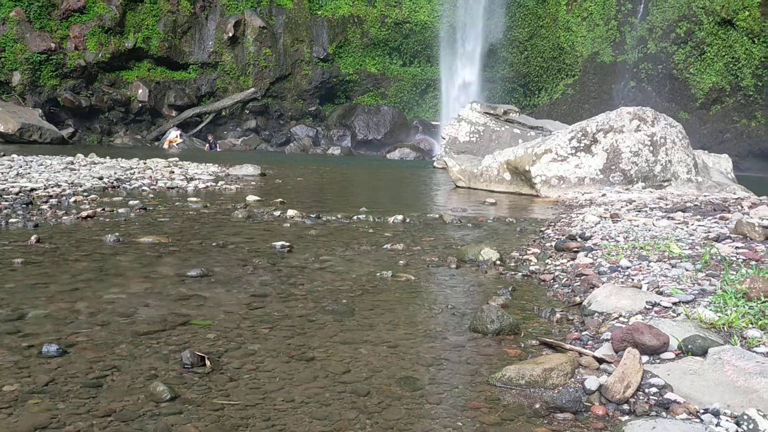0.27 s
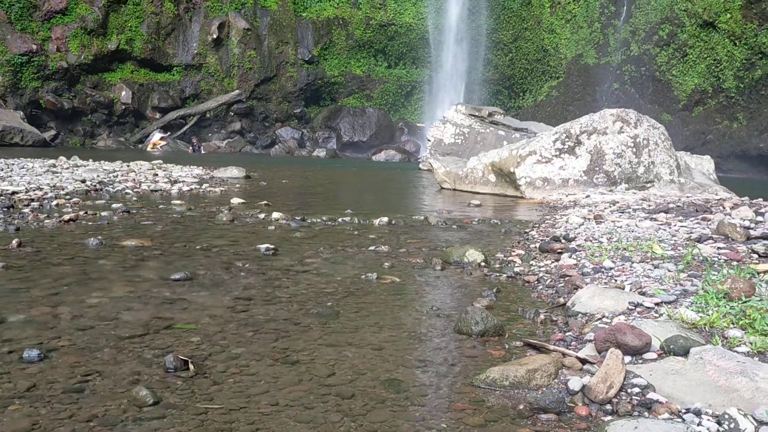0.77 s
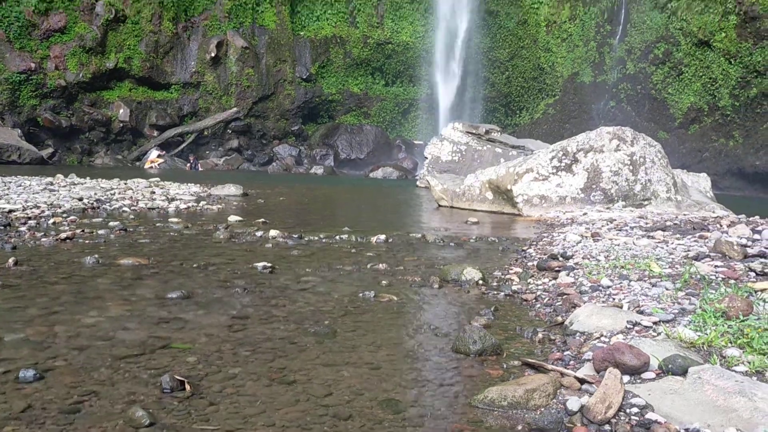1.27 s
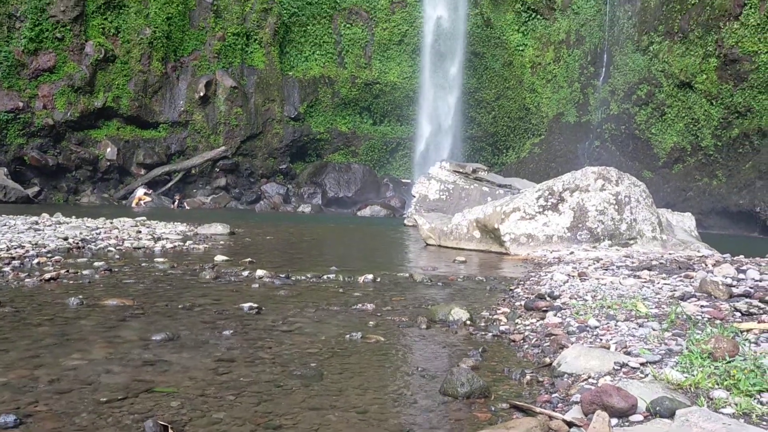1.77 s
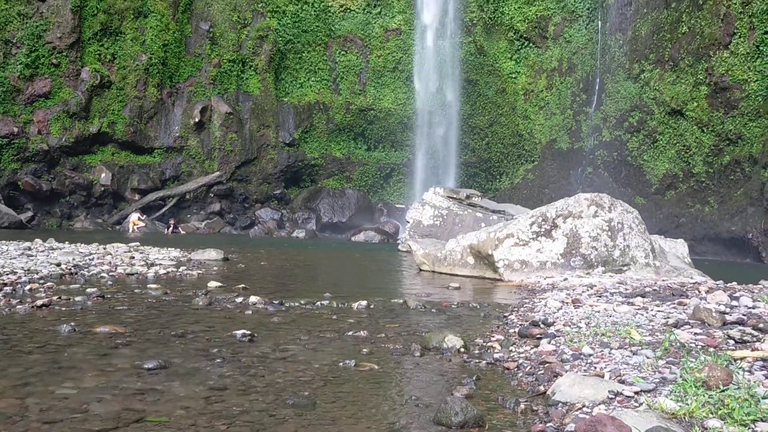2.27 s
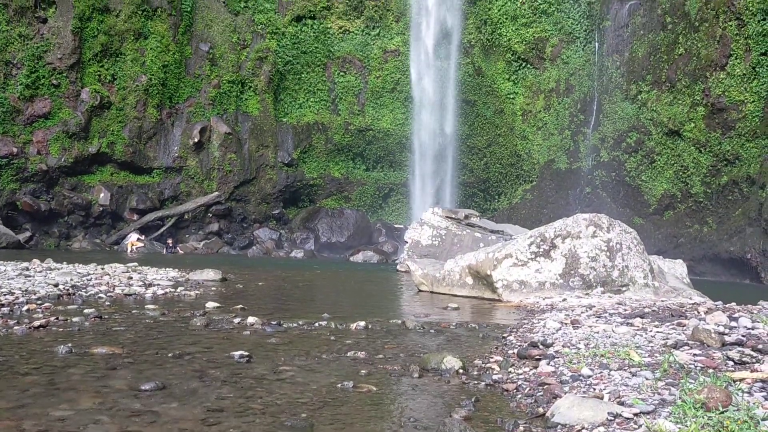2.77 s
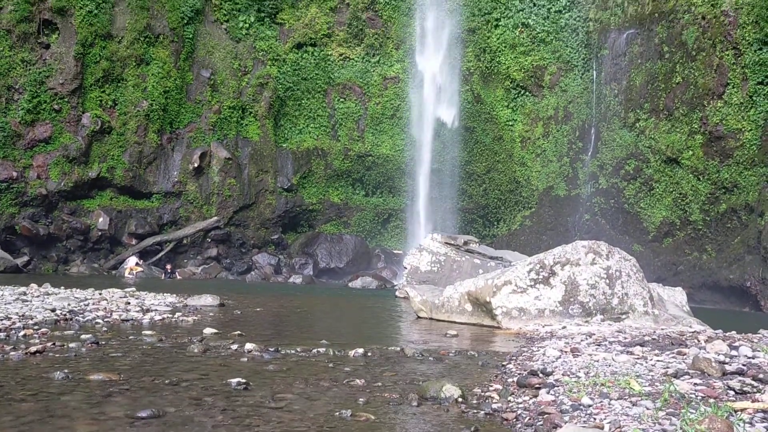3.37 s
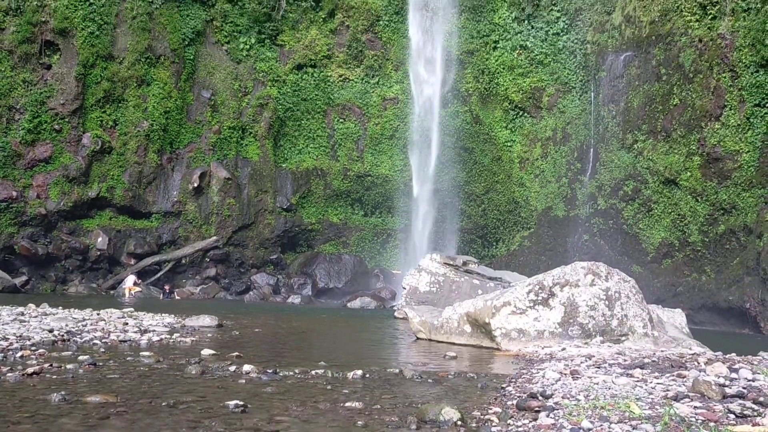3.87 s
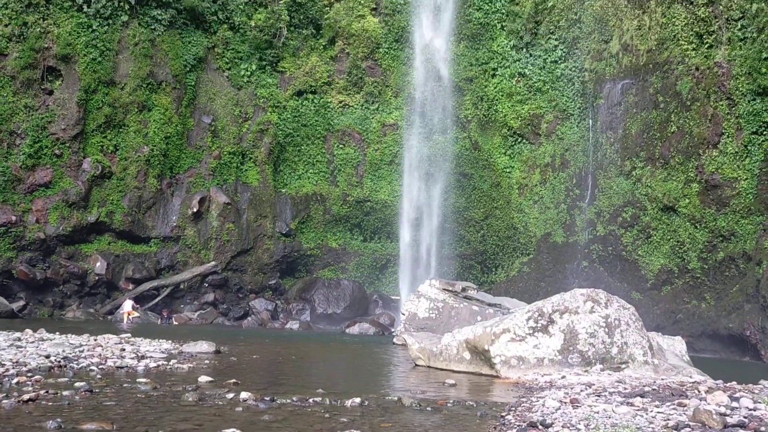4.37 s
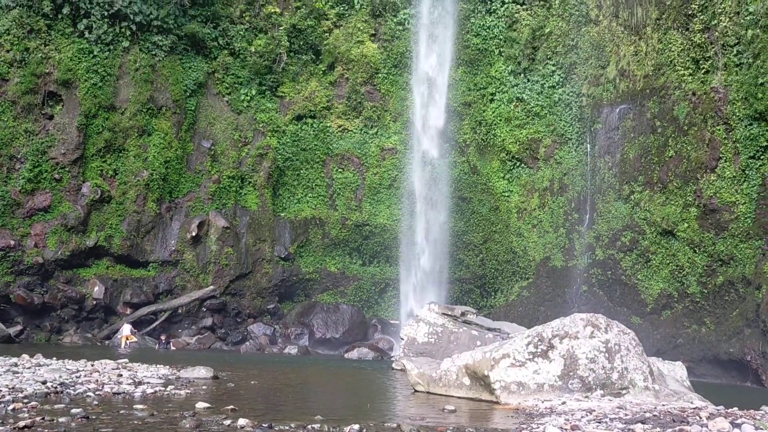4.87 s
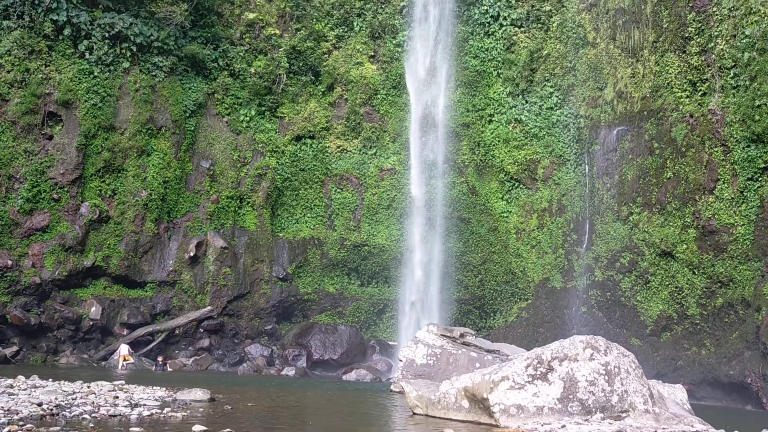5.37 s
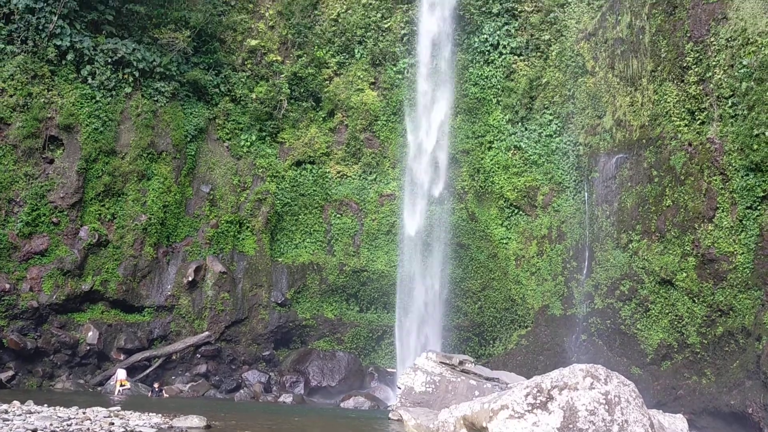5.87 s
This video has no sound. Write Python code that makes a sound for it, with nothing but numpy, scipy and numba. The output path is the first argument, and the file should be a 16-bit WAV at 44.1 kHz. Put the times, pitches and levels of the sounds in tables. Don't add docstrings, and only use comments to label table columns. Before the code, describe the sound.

Constant outdoor waterfall rush, crisp high hiss above a low watery roar, slowly growing fuller, dotted with tiny droplet ticks and bubbles.

```python
import sys
import numpy as np
from scipy import signal
from scipy.fft import rfft, irfft, next_fast_len
from scipy.io import wavfile
from scipy.ndimage import uniform_filter1d
from numba import njit

SR = 44100
rng = np.random.default_rng(int(sys.argv[2]) if len(sys.argv) > 2 else 0)


def nominal_scale(level):
    x = np.asarray(level, float) / 20
    return 10 ** x


def file_out(sig):
    cols = np.atleast_2d(sig).T
    lim = np.clip(cols, -1, 1)
    pcm = np.round(lim * 32767).astype(np.int16)
    wavfile.write(sys.argv[1], SR, pcm)


N = 269892


def plunge():
    # pitch_hz, density_db (per Hz)
    roar_tone = [(76, -29.5), (130, -2.5), (212, 1), (435, 0.5), (570, 1.5), (750, 3), (890, 0), (1130, -7),
                 (1600, -14), (2200, -16.5), (2600, -21), (3000, -28), (3500, -46.5), (6800, -120)]
    # crest_s, lift_db
    surges = [(.61, 2.5), (1.0, 3.5), (1.1, 3), (1.32, 1.5), (1.45, -3), (1.77, 0), (2.04, -4), (2.17, 1),
              (2.36, 5), (2.5, -1), (2.85, 3), (3.0, 1.5), (3.28, 3), (3.45, 2.5), (3.75, 0), (3.98, 3.5),
              (4.2, -1), (4.4, 3), (4.6, 1), (4.8, 1), (5.2, 2), (5.55, 2), (5.7, -3), (5.95, 1.5),
              (6.09, 2.5)]
    # crest_s, lift_db
    slaps = [(.62, 0), (1.0, 0.5), (1.45, 2), (1.86, 0.5), (2.04, -0.5), (2.34, 2), (3.2, 0.5), (3.5, 0.5),
             (3.8, -1.5), (4.02, -4), (4.32, 1), (4.46, 1.5), (4.58, 2), (5.2, 1.5), (5.32, 2), (5.7, -2),
             (6.01, 3)]
    crossover_hz, roar_db, splash_db = 1400, -13, -20.5
    turbulence = churn(80.04, count=17, shared_db=-0.86, own_db=0.15, rate=20)
    bubbles = swarm(count=9000, lo_hz=149.0, hi_hz=3307.0, cycles=1.75, spread_db=2.0, glide=0.18, tilt=0.98)
    body = colour(turbulence + nominal_scale(-9) * bubbles, roar_tone)
    splash = signal.sosfilt(signal.butter(4, crossover_hz, "high", fs=SR, output="sos"), body)
    roar = signal.sosfilt(signal.butter(4, crossover_hz, fs=SR, output="sos"), body)
    roar_level = flow_db() + roar_db + swells_db(*np.transpose(surges), rise_s=0.027, fall_s=0.061)
    splash_level = flow_db() + splash_db + swells_db(*np.transpose(slaps), rise_s=0.04, fall_s=0.072)
    return roar / np.std(roar) * nominal_scale(roar_level) + splash / np.std(splash) * nominal_scale(splash_level)


def spray():
    # pitch_hz, density_db (per Hz)
    hiss_tone = [(1820, -53), (3100, -28.5), (4540, -14), (5800, -7), (7470, 3), (7770, -1), (8050, -10),
                 (8500, -28), (8650, -64), (8960, -54.5), (11600, -79.5), (19700, -120)]
    # crest_s, lift_db
    bursts = [(1.15, 2), (2.17, 1.2), (2.87, 0.9), (3.27, 0.5), (3.45, 1), (4.02, 2.5), (4.6, 1.5),
              (4.93, 1), (5.2, 1), (5.65, 1.5)]
    hiss = churn(3100.0, count=5, shared_db=0.29, own_db=0.2, rate=23)
    crackle = swarm(count=14000, lo_hz=3095.0, hi_hz=8780.0, cycles=3.06, spread_db=3.0, glide=0.089, tilt=0.36)
    lift_db = swells_db(*np.transpose(bursts), rise_s=0.064, fall_s=0.052)
    return colour(hiss + nominal_scale(-11.0) * crackle, hiss_tone) * nominal_scale(flow_db() + lift_db)


def port_drops():
    # start_s, level_db (peak), pitch_hz, ring_ms
    droplets = [(0.2634, -24, 7400, 0.55), (1.1691, -18, 7300, 0.58), (1.5779, -12.5, 7500, 0.65),
                (1.8728, -20, 6660, 0.44), (2.0416, -17, 7600, 0.68), (2.9258, -14.5, 7540, 0.67),
                (3.248, -33, 7370, 0.61), (3.4715, -13.5, 7280, 0.7), (3.609, -20.5, 7420, 0.7),
                (3.7235, -17.5, 7030, 0.91), (3.96, -22.5, 7760, 0.75), (4.186, -18, 7700, 0.88),
                (4.299, -24, 7200, 0.67), (4.564, -8, 7260, 0.55), (4.6024, -14.5, 7350, 0.55),
                (4.8423, -14.5, 7370, 0.77), (5.5698, -15, 7250, 0.75), (5.616, -29, 7400, 0.75),
                (5.828, -19.5, 7370, 0.83), (5.998, -11, 7040, 0.61)]
    return singles(droplets, rise=2.42, glide=0., gain_db=23)


def stone_ticks():
    # start_s, level_db (peak), pitch_hz, ring_ms
    ticks = [(1.0331, -32.5, 5100, 0.55), (1.7632, -33, 4900, 0.32), (2.0672, -25, 4990, 0.13),
             (2.4763, -30, 5220, 0.4), (2.9294, -29.5, 5260, 0.47), (3.2723, -18, 5240, 0.25),
             (5.6294, -27, 5240, 0.24)]
    return singles(ticks, rise=0.68, glide=-0.3, gain_db=16.5)


def stream_plops():
    # start_s, level_db (peak), pitch_hz, ring_ms
    plops = [(0.664, -27, 637, 5.6), (0.818, -22.5, 1090, 4.2), (2.043, -17, 920, 2.9),
             (2.236, -20.5, 735, 3.5), (2.349, -22, 660, 5), (2.689, -21, 820, 8.1), (2.833, -25, 735, 5.7),
             (2.989, -20.5, 695, 5.7), (3.358, -22.5, 508, 6.9), (3.688, -18.5, 493, 4.9),
             (3.772, -19, 803, 4.5), (4.158, -21, 869, 4.7), (4.449, -12.5, 704, 2.5),
             (4.567, -18.5, 966, 3.7), (5.202, -16.5, 940, 3.7), (5.265, -30, 382, 5)]
    return singles(plops, rise=0.45, glide=0.15, gain_db=-4.0)


def small_splashes():
    # start_s, level_db (peak), pitch_hz, ring_ms
    splashes = [(1.2335, -43, 1630, 2.5), (2.0464, -44, 1580, 2.9), (2.3484, -38.5, 1460, 3.2),
                (2.7494, -47, 1430, 2.9), (4.307, -34.5, 1510, 1.8), (4.5688, -32.5, 1530, 2.3),
                (5.168, -36.5, 1690, 2), (5.5043, -36.5, 1920, 3), (5.883, -39, 1880, 2.5)]
    return singles(splashes, rise=0.12, glide=0.11, gain_db=6)


def deep_gulps():
    # start_s, level_db (peak), pitch_hz, ring_ms
    gulps = [(.99, -45, 165, 35), (1.66, -50, 139, 25), (2.13, -44, 190, 25), (2.92, -48, 172, 28),
             (3.96, -46, 188, 33), (5.68, -46, 210, 25), (5.86, -48, 201, 28)]
    return singles(gulps, rise=0.89, glide=0.19, gain_db=9)


def wind():
    # pitch_hz, density_db (per Hz)
    wind_tone = [(2, -12), (8, -8.5), (22, -3.5), (42, -4), (80, -7), (120, -8.5), (200, -51.5)]
    # crest_s, lift_db, length_s
    gusts = [(.61, 7, 0.059), (0.993, 8, .1), (1.296, 11.5, 0.11), (1.51, 8.5, 0.22), (1.86, 13, 0.17),
             (2.172, 10, 0.12), (2.9, 12.5, 0.09), (3.1, 8, .1), (3.327, 12, 0.13), (3.6, 9, 0.11),
             (3.956, 14, 0.073), (4.27, 9, .05), (4.4, 2, .05), (4.56, 7, .1), (4.89, 6, .12),
             (5.07, 9, .06), (5.2, 16, 0.13), (5.403, 16, 0.25), (5.748, 14.5, 0.09), (5.9, 10.5, 0.065),
             (6.007, 12, 0.072), (6.12, 8, .05)]
    calm_db, rise_share = -62.5, 0.68
    crest_s, lift_db, length_s = np.transpose(gusts)
    rumble = colour(rng.standard_normal(N), wind_tone)
    return rumble * nominal_scale(calm_db + swells_db(crest_s, lift_db, rise_share * length_s, length_s))


def flow_db():
    # time_s, level_db (of the spray)
    flow = [(.4, -34.5), (.75, -33.5), (1.1, -33), (1.4, -32.5), (1.8, -31.5), (2.3, -31.6), (2.75, -31),
            (3.2, -31), (3.7, -30.5), (4.2, -30.5), (4.7, -30), (5.3, -30), (5.8, -29.5), (6.12, -30.5)]
    return np.interp(np.arange(N) / SR, *np.transpose(flow))


def swells_db(crest_s, lift_db, rise_s, fall_s):
    coarse = np.arange(0, N, 64)
    late_s = coarse[:, None] / SR - crest_s
    shape = np.exp(-(late_s / np.where(late_s < 0, rise_s, fall_s)) ** 2)
    return np.interp(np.arange(N), coarse, np.max(lift_db * shape, axis=1))


def churn(lo_hz, count, shared_db, own_db, rate):
    size = next_fast_len(N)
    third = 3 * np.log2(np.arange(size // 2 + 1) * SR / size / lo_hz + 1e-9)
    total, shared = 0, walk(rate)
    for k in range(count):
        place = np.clip(np.clip(third, 0, count - 1) - k, -1, 1)
        spectrum = rfft(rng.standard_normal(size)) * np.cos(np.pi * place / 2)
        band = irfft(spectrum, size)[:N]
        total = total + band * nominal_scale(shared_db * shared + own_db * walk(1.2 * rate))
    return total / np.std(total)


def walk(rate):
    hold = int(SR / rate)
    held = np.repeat(rng.standard_normal(N // hold + 1), hold)
    return 1.3 * uniform_filter1d(uniform_filter1d(held, hold), hold)[:N]


def swarm(count, lo_hz, hi_hz, cycles, spread_db, glide, tilt):
    when, pitch, rare = rng.random((count, 3)).T
    hz = lo_hz + (hi_hz - lo_hz) * pitch
    size = nominal_scale(-spread_db * np.log(1 - .995 * rare)) * hz ** tilt
    y = grains(N, (when * N).astype(np.int64), hz, cycles * SR / hz, size, 0.27, glide)
    return y / np.std(y)


def singles(events, rise, glide, gain_db):
    start_s, level_db, pitch_hz, ring_ms = np.transpose(events)
    start = (start_s * SR).astype(np.int64)
    return grains(N, start, pitch_hz, ring_ms * SR / 1000, nominal_scale(level_db + gain_db), rise, glide)


@njit
def grains(count, start, hz, ring, size, rise, glide):
    out = np.zeros(count)
    for g in range(len(start)):
        phase, step = 0., 2 * np.pi * hz[g] / SR
        fall, swell = 1., 1.
        for i in range(start[g], min(count, start[g] + int(8 * ring[g]) + 2)):
            out[i] += size[g] * fall * (1 - swell) ** 2 * np.sin(phase)
            phase += step
            step *= 1 + glide / (6 * ring[g])
            fall *= np.exp(-1 / ring[g])
            swell *= np.exp(-1 / (rise * ring[g]))
    return out


def colour(x, points):
    hz, db = np.transpose(points)
    size = next_fast_len(N)
    bin_hz = np.arange(size // 2 + 1) * SR / size + 1e-3
    gain = nominal_scale(np.interp(np.log(bin_hz), np.log(hz), db))
    y = irfft(rfft(x, size) * gain, size)[:N]
    return y / np.std(y)


def scene():
    fall = plunge() + spray()
    near = port_drops() + stone_ticks() + stream_plops() + small_splashes() + deep_gulps()
    return (fall + near + wind())[None]


def band_limit(x):
    return signal.sosfilt(signal.butter(12, 9110, fs=SR, output="sos"), x)


def record(dry):
    fade_start_s, fade_end_s, fade_first = 0.107, 0.32, 0.092
    offset_db, settle_s = -34, 0.75
    t = np.arange(N) / SR
    x = signal.sosfilt(signal.ellip(8, .2, 75, 8350, fs=SR, output="sos"), dry)
    fade = np.interp(t, [fade_start_s, fade_end_s], [fade_first, 1]) * (t > fade_start_s)
    offset = nominal_scale(offset_db) * np.exp(-t / settle_s)
    mix = fade * x - (fade - fade_first * (fade > 0)) * offset
    return band_limit(mix)


dry = scene()
out = record(dry)
file_out(out)
```